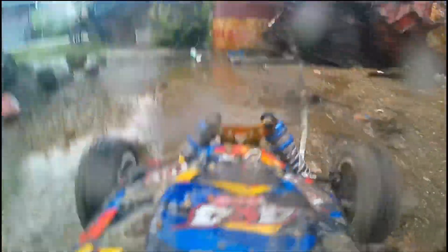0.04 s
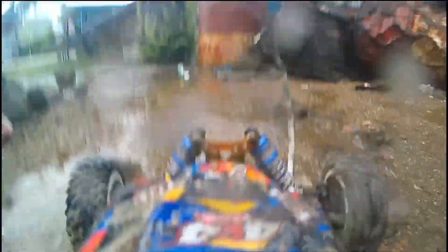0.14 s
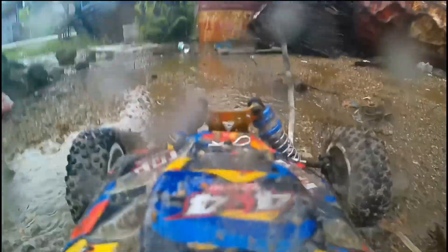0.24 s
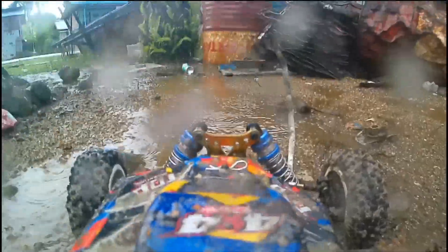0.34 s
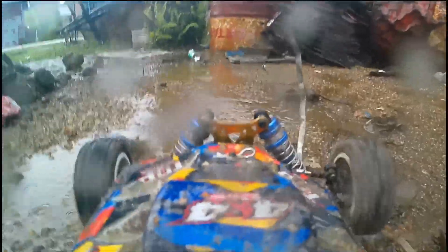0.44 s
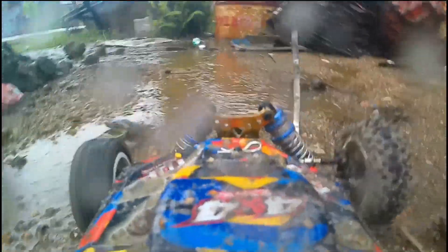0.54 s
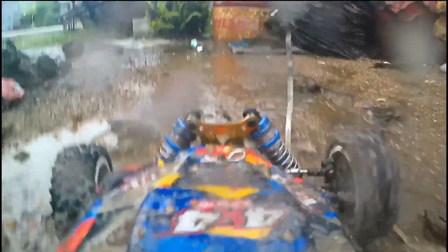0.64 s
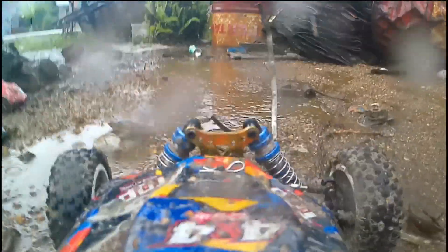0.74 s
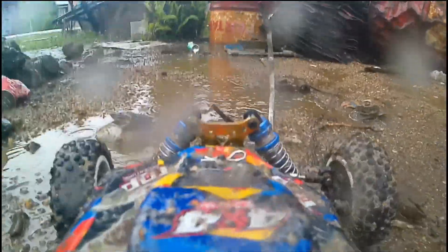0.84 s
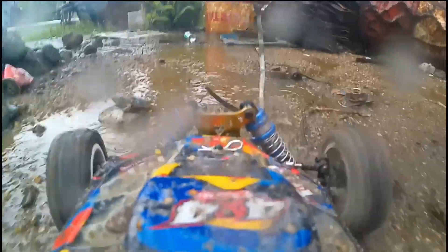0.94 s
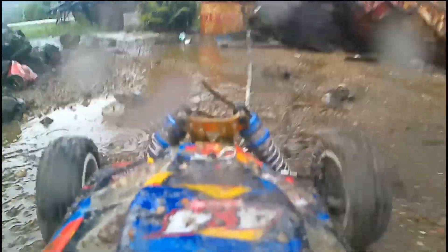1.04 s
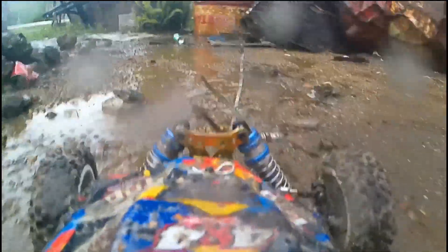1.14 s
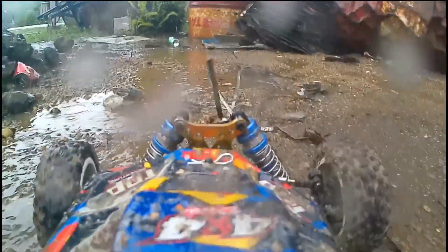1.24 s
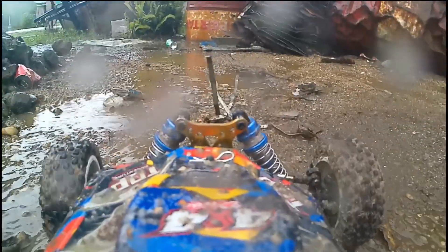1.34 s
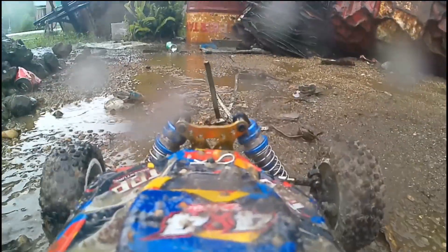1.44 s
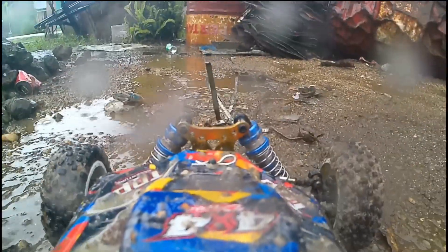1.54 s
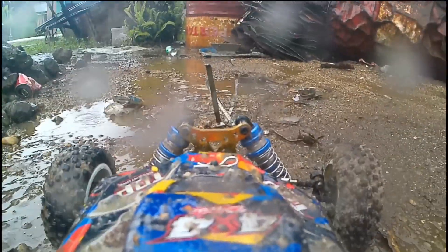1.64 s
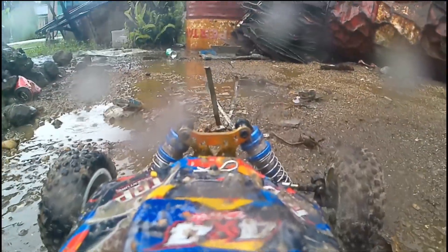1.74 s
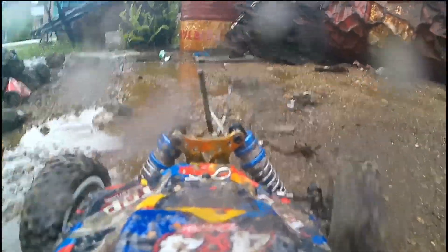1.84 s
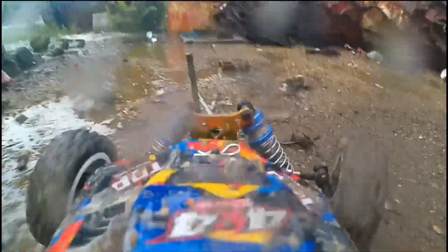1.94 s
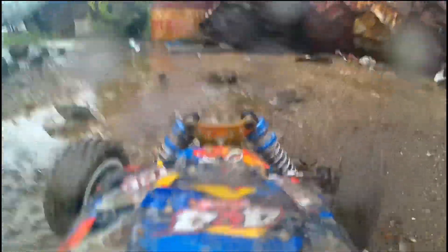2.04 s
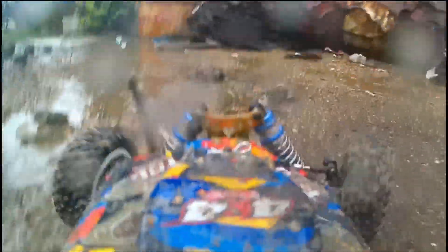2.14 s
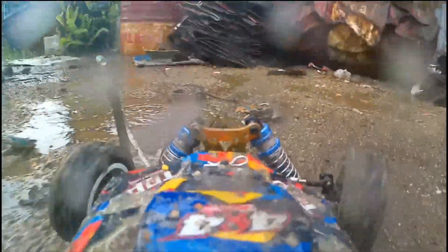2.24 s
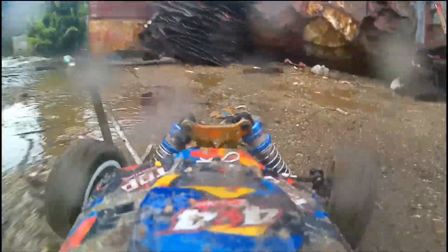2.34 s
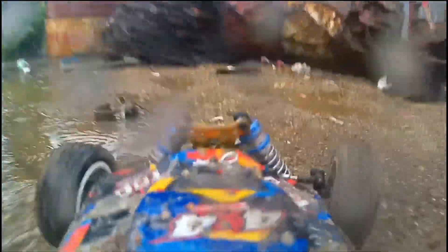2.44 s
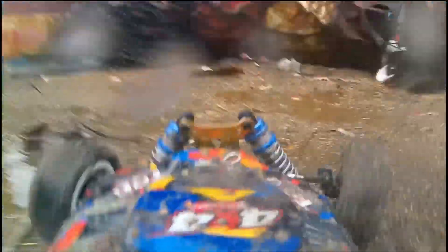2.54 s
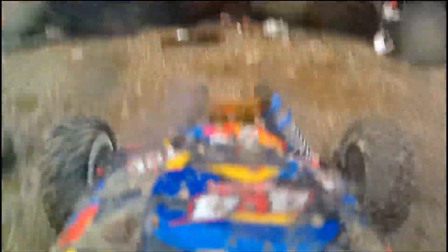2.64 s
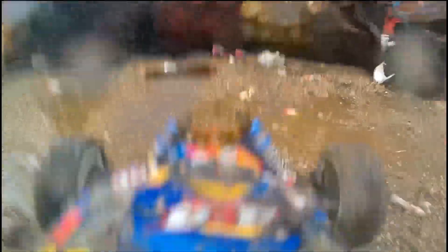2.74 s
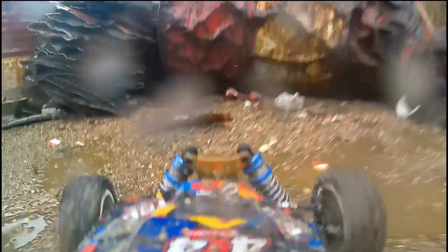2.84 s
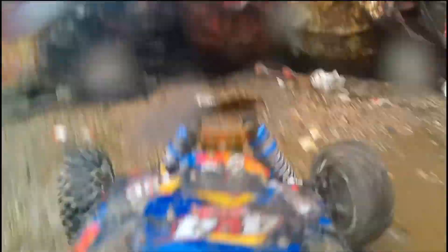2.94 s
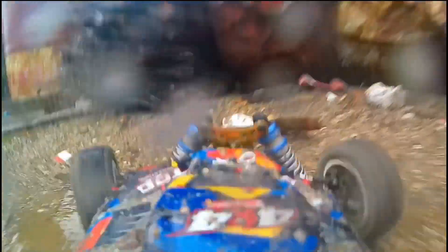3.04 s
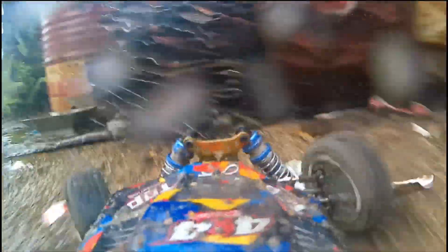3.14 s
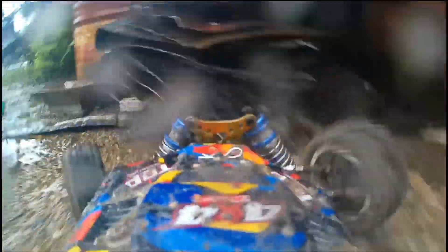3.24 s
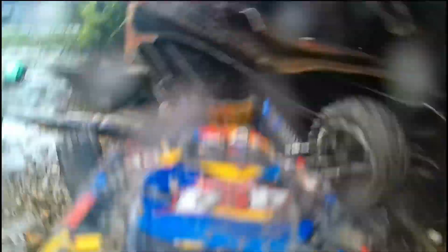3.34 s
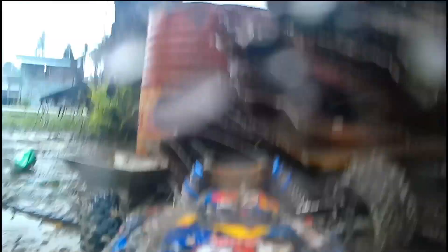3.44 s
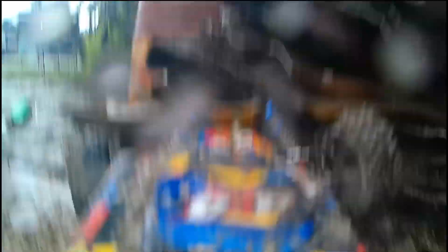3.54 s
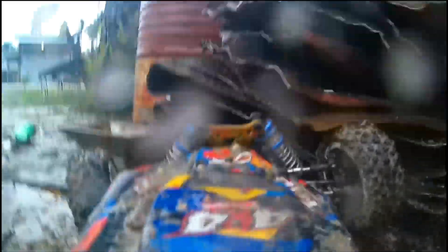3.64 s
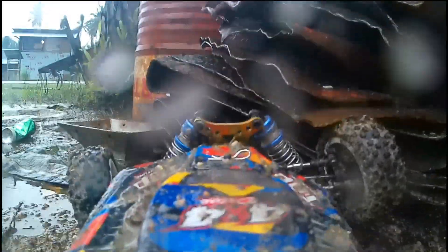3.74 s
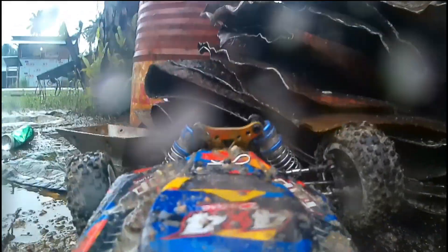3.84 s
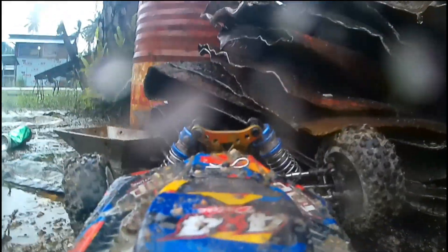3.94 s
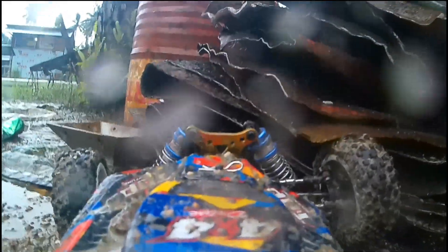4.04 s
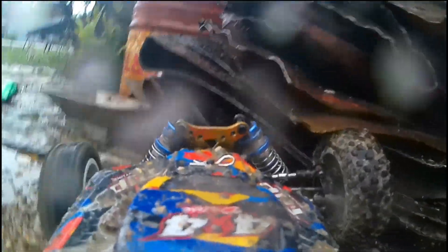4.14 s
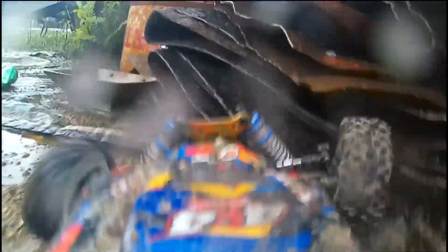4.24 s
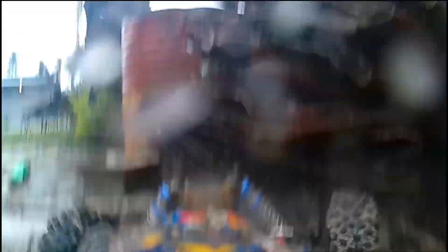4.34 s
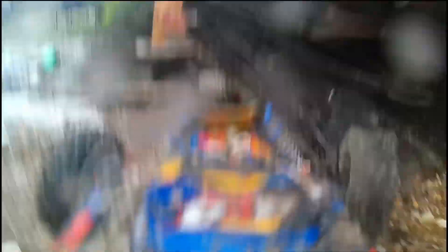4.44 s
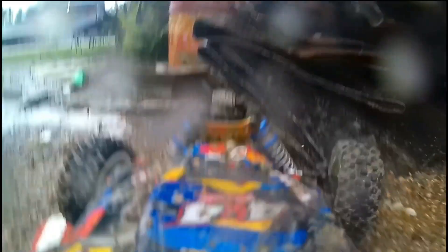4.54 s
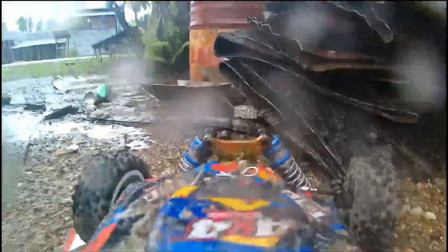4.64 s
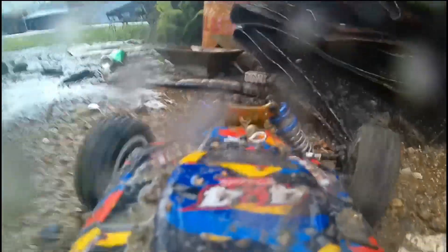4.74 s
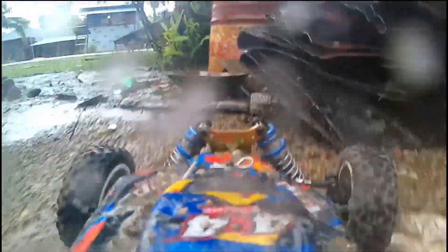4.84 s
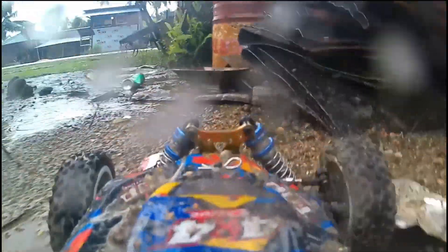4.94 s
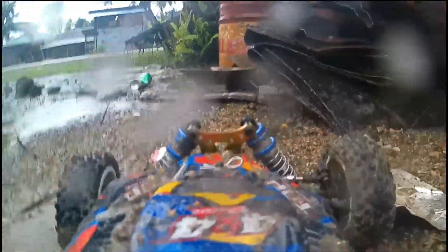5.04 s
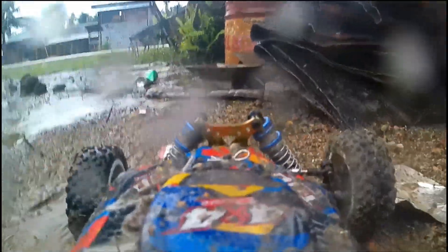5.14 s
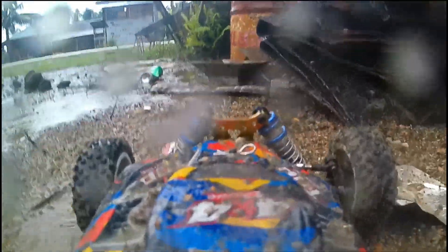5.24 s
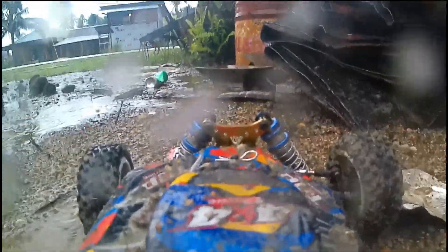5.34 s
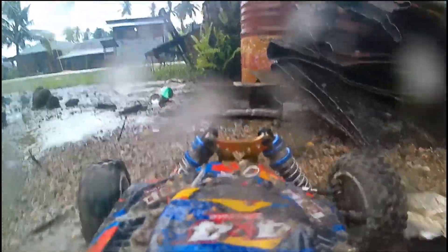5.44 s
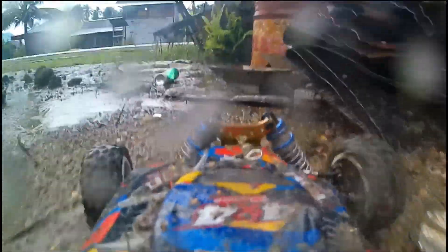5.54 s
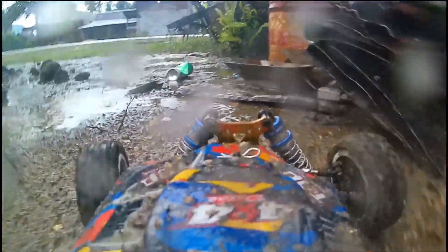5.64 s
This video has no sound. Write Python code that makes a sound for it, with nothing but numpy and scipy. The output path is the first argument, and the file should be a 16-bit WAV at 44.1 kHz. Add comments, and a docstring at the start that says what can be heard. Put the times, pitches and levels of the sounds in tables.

```python
"""Electric buggy on wet gravel

A small electric buggy darts over wet gravel and puddles in short bursts of throttle.
The microphone rides along in a closed plastic camera case on its body, so everything is close.
Grit and spray are random impacts, knocks are decaying noise bursts, tyres and springs are filtered rumble.
Gears are harmonics following the motor speed, and each start adds a chirp from the motor windings.
Grit, gears and blows ring through the case resonances; the whole mix overloads the microphone."""
import sys
import numpy as np
from scipy import signal
from scipy.fft import rfft, irfft
from scipy.io import wavfile
from scipy.ndimage import uniform_filter1d

SR = 44100
rng = np.random.default_rng(int(sys.argv[2]) if len(sys.argv) > 2 else 0)


def digitize_waveform(pressure):
    """Quantize a signal to 16-bit integers and store it at the path in sys.argv[1].

    Rows of a 2-D input are taken as channels; values are limited to [-1, 1].
    """
    field = np.atleast_2d(pressure).T
    bounded = np.clip(field, -1, 1)
    quanta = np.round(bounded * 32767).astype(np.int16)
    wavfile.write(sys.argv[1], SR, quanta)


N = 251370
T = np.arange(N) / SR  # time [s]
BINS = np.fft.rfftfreq(2 * N, 1 / SR)  # filter frequencies [Hz]

# All levels below are relative, ahead of the mix gains and the microphone's overload.

# still air around the buggy: (frequency [Hz], level [dB])
AIR_SPECTRUM = [(15, -56), (25, -17), (167, -3), (318, -16), (462, -8.5), (573, -12), (3090, -23),
                (3440, -27.5), (15000, -52.5)]
AIR_DB = -64
# faint distant hum: (frequency [Hz], level [dB])
HUM_TONES = [(253, -65), (447, -76.5), (759, -71)]

# each dart rolls steadily, then coasts to rest: (start [s], steady roll [s], coasting [s],
# grit rattle [dB], tyre thud [dB], chassis heave [dB])
DARTS = [(0, 0.063, 0.57, -9, -17.5, -21), (.546, 0.13, 0.48, -16.5, -14, -18.5),
         (0.976, 0.13, 0.61, -19.5, -17.5, -15.5), (1.921, 0.024, 1.4, -15.5, -16, -14),
         (2.325, 0.38, 1.7, -16, -18, -15), (3.018, 0.33, 0.65, -16, -19.5, -15),
         (3.374, 0.18, 0.46, -15.5, -12.5, -10.5), (4.187, 0.14, 0.84, -17.5, -14.5, -19.5),
         (4.803, 0.092, 0.73, -22, -17.5, -19.5), (5.483, 0.024, 0.97, -13.5, -15.5, -19)]
DART_ATTACK_S = 0.0023
RATTLE_POWER, THUD_POWER, HEAVE_POWER = 5.72, 7.67, 3.5  # each falls as this power of coasting speed
# resonances of the case and chassis: (frequency [Hz], full width at half gain [Hz], level [dB])
CASE_MODES = [(452.7, 140, -4.5), (680, 90, -32.5), (1157, 268, -0.5), (1326, 80, -7), (1470, 153, -2),
              (1611, 187, -6.5), (2081, 290, -6.5), (2425, 83, -16), (2830, 57, -24), (3450, 170, -18.5),
              (4110, 97, -16), (4435, 180, -19.5), (6500, 1500, -39)]

# puddle water thrown up by spinning tyres: (from [s], to [s], level [dB])
PUDDLE_WASHES = [(0, 0.146, -21.5), (1.04, 1.127, -35.5), (2.462, 2.673, -37.5), (3.106, 3.269, -24)]
# water and grit landing on the case itself: (frequency [Hz], level [dB])
SPRAY_SPECTRUM = [(500, -20.5), (2500, 5.5), (4200, 5.5), (5200, -10.5), (7000, -10), (15000, -27.5)]

# tyres drumming on the ground: (frequency [Hz], level [dB])
THUD_SPECTRUM = [(50, -25.5), (85, 3.5), (120, 2), (190, -1), (290, -12), (450, -13), (600, -17),
                 (900, -24), (3000, -80)]
# body heaving on its springs: (frequency [Hz], level [dB])
HEAVE_SPECTRUM = [(8, -14), (22, -4.5), (50, 0), (70, -5.5), (110, -13.5), (300, -53.5), (1000, -100)]

# stones and suspension stops striking the chassis: (time [s], level [dB], crack above that level [dB])
BLOWS = [(.081, 0.5, -9.5), (.128, 0, -16.5), (0.165, -12.5, -30), (0.266, -18, -4.5), (0.305, -30, 8.5),
         (.437, -37, 3.5), (.757, -11, -30), (1.068, -5, -8), (1.122, -8, -3), (1.287, -10.5, -13.5),
         (1.299, -16, -33), (1.33, -32, -4), (1.425, -44, 5), (1.483, -37.5, -8), (1.551, -45.5, 0.5),
         (1.699, -38, -36.5), (1.818, -37.5, -11), (1.952, 2, -22.5), (2.168, -6.5, 3),
         (2.205, -14.5, -37.5), (2.291, -11, -45), (2.412, -8, -4), (2.698, -8.5, -14.5), (2.733, -3.5, -6),
         (2.818, -8.5, -3), (2.928, 2.5, -26), (3.027, -5, -21.5), (3.197, 4.5, -25.5), (3.24, 4, -35),
         (3.274, -1.5, -5.5), (3.325, -5.5, -14.5), (3.451, -5, -10.5), (3.481, 0, -2.5),
         (3.532, 4.5, -19.5), (3.618, -18, 10), (3.63, -3, -14.5), (3.669, -10, -15.5), (3.787, -25, -26),
         (3.8, -15, -42), (4.337, -2, -6.5), (4.376, -1.5, -21.5), (4.408, 0.5, -47.5), (4.423, 0.5, -20),
         (4.525, -5.5, -6), (4.586, -13.5, -8), (4.687, -30, -29.5), (4.733, -28.5, -3.5),
         (4.781, -16, -20.5), (4.915, -10.5, -5.5), (5.165, -25.5, -30)]
# hard crack and soft thump of a blow: (frequency [Hz], level [dB])
CRACK_SPECTRUM = [(300, 0.5), (800, -11.5), (4200, 5), (5500, -10.5), (8000, -14.5), (15000, -32.0)]
THUMP_SPECTRUM = [(60, -18.5), (200, -11.5), (350, -8.5), (700, -7.5), (1100, -3.0), (3000, -59)]

# wheels rolling through a rut: (deepest [s], level [dB], half length [s])
RUT_DIPS = [(0.149, -13.5, 0.028), (0.301, -26, 0.018), (0.76, -15.5, 0.018), (1.225, -31.5, 0.0052),
            (1.391, -34, 0.026), (2.784, -2.5, 0.011), (2.964, -19, 0.068), (3.546, -9, 0.045),
            (3.71, -14, 0.015), (3.839, -34.5, 0.015), (4.403, -11, 0.026), (4.589, -18, 0.042),
            (5.009, -15.5, 0.0088), (5.072, -23.5, 0.018), (5.541, -15, 0.02), (5.622, -19.5, .014)]

# motor revving up and let go: (top speed reached [s], spin-up [s], top tooth rate [Hz], whine [dB])
REV_SURGES = [(.658, .14, 1619, -0.5), (1.052, .08, 1619, -5), (1.107, .12, 1302, -7),
              (2.503, .14, 2066, -3.5), (2.625, .15, 1821, -3.5), (3.182, 0.098, 2751, 7.5),
              (4.312, .125, 1708, -2), (4.913, .11, 1400, -9), (5.608, 0.12, 1456, -17)]
SPIN_DOWN_S, WHINE_RELEASE_S = .17, 0.016
WHINE_POWER = 2  # whine grows as this power of motor speed
# brighter path up the camera mount: (frequency [Hz], level [dB])
MOUNT_SPECTRUM = [(900, -26), (1900, -6), (2700, 0.5), (3600, -18.5), (5000, -20), (9000, -42.5)]

# each pull of the throttle: (time [s], starting chirp [dB])
THROTTLE_PULLS = [(0.54, -14), (0.973, -12.5), (1.92, -12), (4.182, -11), (4.807, -11), (5.481, -11.5)]
CHIRP_HZ, CHIRP_S = 4040, .029
# body kicked at a start: (frequency [Hz], level [dB])
KICK_SPECTRUM = [(80, -18.5), (210, 4), (320, -12.0), (440, 5.0), (700, -18.5), (2000, -47)]

# throttle held: (from [s], to [s])
THROTTLE_HELD = [(.55, .63), (.98, 1.06), (1.93, 2.14), (2.32, 2.75), (5.49, 5.7)]
# rasp of the loaded motor: (frequency [Hz], level [dB])
RASP_SPECTRUM = [(300, -22.5), (1300, 16.5), (2800, -5), (4300, 9.5), (5200, -31.5), (6500, -38),
                 (12000, -49)]

TOP_HZ = 15500  # upper edge of the microphone channel


def undb(db):
    """Decibels to gain."""
    return 10 ** (np.asarray(db) / 20)


def unit(x):
    """Scale to rms 1."""
    return x / np.sqrt(np.mean(x ** 2))


def walk(rate):
    """Random drift with a spread near 1, joining `rate` random points a second by straight lines."""
    knots = rng.standard_normal(N // 20)
    return 1.31 * np.interp(T * rate, np.arange(len(knots)), knots)


def ring(x, gain):
    """Causal minimum-phase filter with the given gain at each frequency."""
    cepstrum = irfft(np.log(gain + 1e-7))
    # folding the cepstrum forward puts all the ringing after the blow
    cepstrum[1:N] *= 2
    cepstrum[N + 1:] = 0
    response = np.exp(rfft(cepstrum))
    return irfft(rfft(x, 2 * N) * response)[:N]


def shape(points):
    """Gain at each frequency from (frequency [Hz], level [dB]) points, joined on a log axis."""
    hz, db = np.transpose(points)
    return undb(np.interp(np.log(BINS + 1), np.log(hz), db))


def case(x):
    """The steep resonances through which the chassis reaches the microphone."""
    gain = sum(undb(db) / (1 + (2 * (BINS - hz) / width) ** 2) for hz, width, db in CASE_MODES)
    return ring(x, gain)


def grains(rate, spread_db):
    """Random tiny impacts, `rate` a second on average, most weak and a few strong."""
    size = undb(spread_db * np.minimum(rng.exponential(size=N), 4))
    struck = rng.random(N) < rate / SR
    return unit(struck * size * rng.choice([-1, 1], N))


def scatter(x, depth_db, rate):
    """Stones land in changing places, so each resonance flares and sinks by itself."""
    for hz, width, _ in CASE_MODES[:10]:
        band = signal.lfilter(*signal.iirpeak(hz, hz / (2 * width), fs=SR), x)
        flare = undb(depth_db * np.clip(walk(rate), -2, 2))
        x = x + band * (flare - 1)
    return x


def yard(hum_db=0):
    """Muffled outdoor air as filtered noise, with a faint distant hum of slightly wavering tones."""
    air = unit(ring(rng.standard_normal(N), shape(AIR_SPECTRUM))) * undb(AIR_DB + 1.2 * walk(0.84))
    hum = 0
    for hz, db in HUM_TONES:
        hum = hum + undb(db) * np.sqrt(2) * np.sin(2 * np.pi * hz * T + 0.44 * walk(8))
    return air + undb(hum_db) * hum


def darts():
    """Gains of rattle, thud and heave: a quick start, a steady roll, then friction slows the wheels evenly."""
    rattle, thud, heave = np.zeros((3, N))
    for start, steady_s, coast_s, rattle_db, thud_db, heave_db in DARTS:
        attack = np.clip((T - start) / DART_ATTACK_S, 0, 1)
        speed = np.clip(1 - (T - start - steady_s) / coast_s, 0, 1)
        rattle = np.maximum(rattle, attack * undb(rattle_db) * speed ** RATTLE_POWER)
        thud = np.maximum(thud, attack * undb(thud_db) * speed ** THUD_POWER)
        heave = np.maximum(heave, attack * undb(heave_db) * speed ** HEAVE_POWER)
    return rattle, thud, heave


def gravel(drive, rattle_db=-1, dense_db=-20, pebble_db=-2):
    """At speed the studs fling a dense rattle of grit; rolling slowly, single pebbles click."""
    dense = drive / (drive + undb(dense_db))  # share of dense grit, half where drive equals dense_db
    grit = grains(rate=2000, spread_db=2.6) + .3 * rng.standard_normal(N)
    grit = unit(grit * undb(3 * walk(130)))
    pebbles = grains(rate=130, spread_db=2.5)
    hits = np.sqrt(dense) * grit + undb(pebble_db) * np.sqrt(1 - dense) * pebbles
    rattle = unit(scatter(case(hits), depth_db=3.5, rate=60))
    return undb(rattle_db) * rattle * drive


def spray(drive, spatter_db=-16, spatter_s=0.0021, fling_power=1.48):
    """Wet grit spatters on the case in brief ticks, mostly at speed; puddles add a dense wash."""
    drops = np.abs(grains(rate=35, spread_db=3.6))
    decay = np.exp(-1 / (spatter_s * SR))
    ticks = unit(signal.lfilter([1], [1, -decay], drops) * rng.standard_normal(N))
    spatter = unit(ring(ticks, shape(SPRAY_SPECTRUM)))
    puddles = sum(undb(db) * ((T >= start) & (T < end)) for start, end, db in PUDDLE_WASHES)
    puddles = uniform_filter1d(puddles, size=1000)  # soft edges
    wash = puddles * unit(ring(grains(rate=2500, spread_db=3), shape(SPRAY_SPECTRUM)))
    return undb(spatter_db) * spatter * drive ** fling_power + wash


def chassis(drumming, rocking, thud_db=-2, heave_db=0, lumpy_db=2):
    """Knobbly tyres drum on the ground while the body heaves on its springs."""
    bumps = grains(rate=450, spread_db=4.5) * undb(lumpy_db * walk(60))
    thud = unit(ring(bumps, shape(THUD_SPECTRUM)))
    heave = unit(ring(grains(rate=880, spread_db=1.0), shape(HEAVE_SPECTRUM)))
    return undb(thud_db) * thud * drumming + undb(heave_db) * heave * rocking


def knocks(body_db=13, edge_db=0, thump_db=7, chatter_s=0.0072, crack_s=0.004, thump_s=0.011):
    """Each blow thumps the chassis and chatters in the loose plastic parts; hard ones crack as well."""
    chatters, cracks, thumps = np.zeros((3, N))
    for s, db, hard_db in BLOWS:
        at = int(s * SR)
        span = slice(at, min(at + SR // 10, N))
        age = T[:span.stop - at]
        chatters[span] += undb(db) * np.exp(-age / chatter_s)
        cracks[span] += undb(db + hard_db) * np.exp(-age / crack_s)
        softness = 1 / (1 + undb(hard_db))  # small hard stones tick without shaking the body
        thumps[span] += undb(db) * softness * np.exp(-age / thump_s)
    body = case(chatters * grains(rate=4000, spread_db=2.0))
    crack = ring(cracks * rng.standard_normal(N), shape(CRACK_SPECTRUM))
    thump = ring(thumps * rng.standard_normal(N), shape(THUMP_SPECTRUM))
    return undb(body_db) * body + undb(edge_db) * crack + undb(thump_db) * thump


def ruts():
    """Each rut loads the suspension in one smooth swell."""
    return sum(undb(db) * np.exp(-((T - s) / half_s) ** 2) for s, db, half_s in RUT_DIPS)


def revs():
    """Tooth rate and gain of the gears: speed climbs evenly under throttle and sags once let go."""
    rate, gain = np.zeros((2, N))
    for top_at, spin_up_s, top_hz, db in REV_SURGES:
        climb = np.clip(1 + (T - top_at) / spin_up_s, 0, 1)
        after = np.maximum(T - top_at, 0)
        loud = undb(db) * climb ** WHINE_POWER * np.exp(-after / WHINE_RELEASE_S)
        # the loudest surge sets the tooth rate
        rate = np.where(loud > gain, top_hz * climb * np.exp(-after / SPIN_DOWN_S), rate)
        gain = np.maximum(gain, loud)
    return rate, gain


def gears(rate, gain, second_db=-6, third_db=-12, pinion_db=0, pinion_ratio=1.6, direct_db=-19):
    """Gritty teeth mesh unevenly in two gear stages; harmonics flare as they sweep through resonances."""
    wobble_hz, rough_db, eccentric = 40, 3.2, .55
    phase = 2 * np.pi * np.cumsum(rate + wobble_hz * walk(450)) / SR
    teeth = np.sin(phase) + undb(second_db) * np.sin(2 * phase) + undb(third_db) * np.sin(3 * phase)
    # an off-centre pinion presses harder once a turn, which adds sidebands
    load = 1 + eccentric * np.sin(phase / 4)
    pinion = undb(pinion_db) * np.sin(pinion_ratio * phase)
    rough_teeth = teeth * undb(rough_db * walk(280))
    rough_pinion = pinion * undb(rough_db * walk(280))
    mesh = gain * load * (rough_teeth + rough_pinion)
    return case(mesh) + undb(direct_db) * ring(mesh, shape(MOUNT_SPECTRUM))


def starts(jolt_db=21.5, slack_s=0.0072, kick_db=13.0, kick_s=0.03):
    """Switched current sings in the stalled motor; the gears take up their slack and the body kicks."""
    edge_s, jolt_s = .004, .018
    chirp, jolt, kick = np.zeros((3, N))
    for s, db in THROTTLE_PULLS:
        age = T - s
        chirp += undb(db) * np.clip(np.minimum(age, CHIRP_S - age) / edge_s, 0, 1)
        taken_up = age > slack_s
        since = np.abs(age - slack_s)
        jolt += undb(db) * taken_up * np.exp(-since / jolt_s)
        kick += undb(db) * taken_up * np.exp(-since / kick_s)
    phase = 2 * np.pi * np.cumsum(CHIRP_HZ * (1 + .012 * walk(600))) / SR
    tone = np.sqrt(2) * np.sin(phase) * undb(3 * walk(350))
    gear_jolt = case(jolt * rng.standard_normal(N))
    body_kick = ring(kick * rng.standard_normal(N), shape(KICK_SPECTRUM))
    return chirp * tone + undb(jolt_db) * gear_jolt + undb(kick_db) * body_kick


def controller(buzz_db=-35):
    """Under held throttle the speed controller whistles, thin and wavering, and the loaded motor rasps."""
    whistle_hz, whistle_db = 10200, -64
    held = sum(1. * ((T > start) & (T < end)) for start, end in THROTTLE_HELD)
    held = uniform_filter1d(held, size=200)  # soft edges
    whistle = undb(whistle_db + 2 * walk(8.4)) * np.sin(2 * np.pi * whistle_hz * T + walk(150))
    rasp = unit(ring(grains(rate=3000, spread_db=2), shape(RASP_SPECTRUM)))
    return held * (whistle + undb(buzz_db) * rasp)


def scene(wheelspin_db=-20, rut_rattle_db=-9, rut_thud_db=0, rut_heave_db=2, patchy_db=2.5, settling_db=-66):
    """Rolling, wheelspin and ruts work grit, tyres and springs; at rest a little grit still settles."""
    rolling, drumming, rocking = darts()
    rate, whine = revs()
    dips = ruts()
    drive = rolling + undb(wheelspin_db) * whine + undb(rut_rattle_db) * dips + undb(settling_db)
    drive = drive * undb(patchy_db * walk(25))  # patchy ground
    drumming = np.hypot(drumming, undb(rut_thud_db) * dips)
    rocking = np.hypot(rocking, undb(rut_heave_db) * dips)
    ground = gravel(drive) + spray(drive) + chassis(drumming, rocking) + knocks()
    motor = gears(rate, whine) + starts() + controller()
    return (yard() + ground + motor)[None]


def record(dry, ceiling=0.65, coupling_hz=8, treble_hz=11500):
    """The microphone overloads, flat tops droop through its coupling, and the top is rounded and cut."""
    knee = 7  # higher bends more sharply into the ceiling
    clipped = dry / (1 + np.abs(dry / ceiling) ** knee) ** (1 / knee)
    coupling = signal.butter(1, [coupling_hz, treble_hz], "band", fs=SR, output="sos")
    coupled = signal.sosfilt(coupling, clipped)
    return signal.sosfilt(signal.ellip(10, .2, 80, TOP_HZ, fs=SR, output="sos"), coupled)


dry = scene()
out = record(dry)
digitize_waveform(out)
```